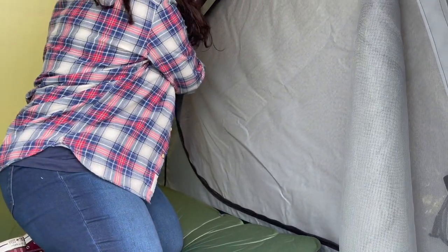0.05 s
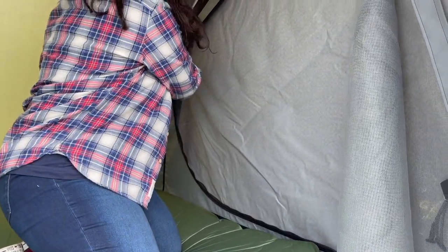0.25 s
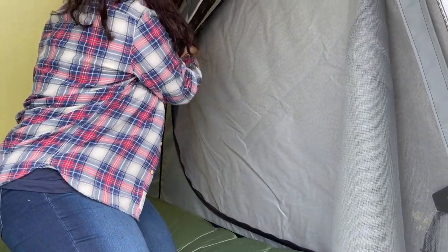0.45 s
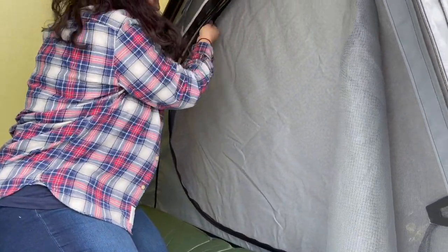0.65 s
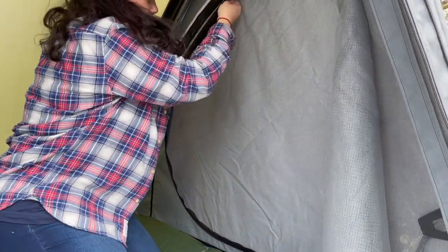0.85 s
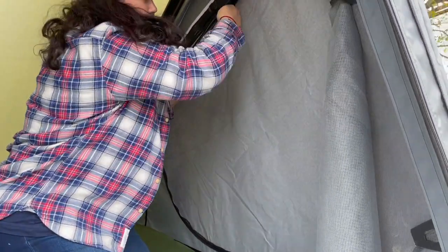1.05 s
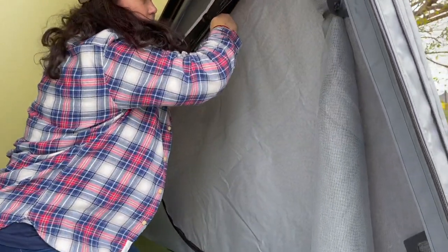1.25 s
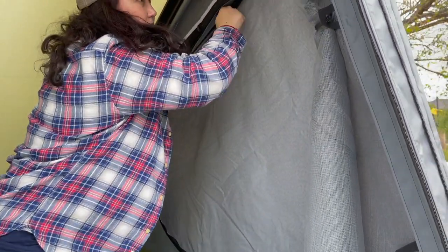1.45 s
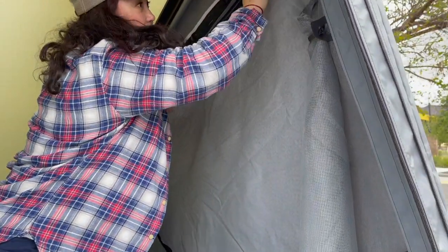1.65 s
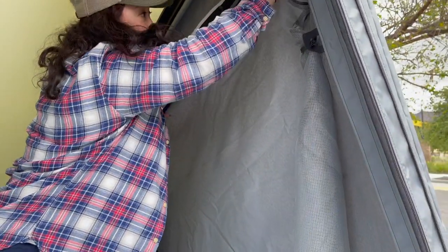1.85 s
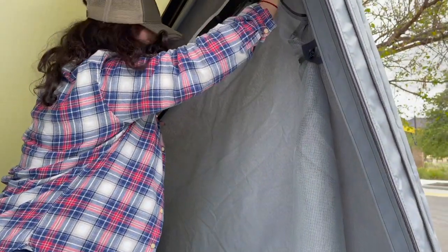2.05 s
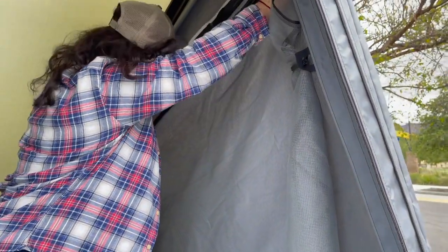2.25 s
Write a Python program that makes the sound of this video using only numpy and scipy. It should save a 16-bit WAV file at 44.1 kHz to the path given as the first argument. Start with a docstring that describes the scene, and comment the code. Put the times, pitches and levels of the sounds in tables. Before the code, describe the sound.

A zipper starts at about 0.2 seconds after a brief hiss, rasping and buzzing along a fabric wall, rising in pitch and stopping near 0.9. The metal tab clinks and cloth rustles. A second stroke runs from 1.4, slowing around 1.9 with dull fabric flaps and jingling, then gives a short last pull and clicks by 2.4. All is close and slightly left in a small, soft space.

```python
"""Zipping a camper wall

A long zipper is pulled along a fabric wall in two strokes, the second slowing round the top corner.
The slider ticks over the teeth: a bright rasp, and a buzz in the taut fabric whose pitch follows the
speed of the hand. The metal pull tab jingles, the wall flaps when tugged, cloth rustles, and a brief
hiss leads into the first stroke, all in a small, soft room and slightly to the left."""
import sys
import numpy as np
from scipy import signal
from scipy.fft import rfft, irfft, next_fast_len
from scipy.io import wavfile
from scipy.ndimage import map_coordinates

SR = 44100
rng = np.random.default_rng(int(sys.argv[2]) if len(sys.argv) > 2 else 0)


def unload_wav(signal):
    """Save mono or channel-first audio to the path in sys.argv[1] as 16-bit WAV at rate SR, clipped to [-1, 1]."""
    wavfile.write(
        sys.argv[1],
        SR,
        np.round(np.clip(np.atleast_2d(signal).T, -1, 1) * 32767).astype(np.int16),
    )


N = 105840

# Colour of the room tone (frequency [Hz], gain [dB])
ROOM_TONE_EQ = [(25, -31), (60, -7), (110, -3.5), (200, -4), (300, -1.5), (450, -11), (750, -28),
                (1200, -20), (1900, -16.5), (3000, -22.5), (9000, -25), (14000, -44)]
# Cloth rustles, and a brief hiss into the first stroke (centre time [s], length [s], level [dB])
NOISE_SWELLS = [(.0, 0.04, -54.5), (0.204, 0.034, -40), (0.986, 0.13, -54.5), (1.063, 0.07, -60),
                (1.136, 0.17, -57.5), (1.257, .1, -40.5), (1.298, 0.044, -42), (1.329, .08, -50.5),
                (2.33, 0.15, -51.5), (2.39, 0.098, -42.5)]
# Colour of those swells (frequency [Hz], gain [dB])
SWELL_EQ = [(80, -10.5), (200, 0.5), (450, 2), (1100, 2.5), (1900, -5), (2550, 2), (3300, -10.5),
            (6000, -17.5), (12000, -12.5), (14000, -37)]
# The wall flaps under a tug (time [s], relative level [dB], pitch [Hz])
FLAPS = [(.24, -35, 180), (0.646, -33, 157), (.675, -18, 230), (.688, -19.5, 166), (1.039, -38.5, 170),
         (1.668, -18, 134), (1.675, -24, 232), (1.73, -17, 181), (1.755, -17.5, 346), (1.781, -18.5, 175),
         (1.803, -16.5, 135.2), (1.82, -24, 130), (1.843, -21.5, 237), (1.862, -16, 110),
         (1.875, -22, 135.9), (1.945, -29, 125), (1.981, -23.5, 149.6), (1.995, -20, 102),
         (2.029, -28.5, 130.5), (2.098, -32.5, 90.1), (2.271, -30, 170), (2.293, -31.5, 200)]
# The fabric sings at taut spots (centre time [s], length [s], pitch [Hz], relative level [dB])
TAUT_SPOTS = [(0.288, 0.069, 1850, -25), (0.333, 0.094, 380, -28.5), (.43, 0.083, 852, -25.5),
              (0.46, 0.09, 2370, -25.5), (0.483, 0.036, 1280, -21.5), (.665, 0.19, 1707, -22),
              (0.673, 0.085, 1930, -24), (.68, 0.11, 1415, -25), (0.764, 0.13, 1210, -28.5),
              (1.45, .04, 425, -28), (1.485, 0.053, 515, -23), (1.617, 0.078, 430, -25.5),
              (1.69, 0.068, 475, -31.5), (2.187, 0.17, 1970, -37)]
# Ringing modes of slider and tab (frequency [Hz], level [dB], free t60 [s])
METAL_MODES = [(5505, 0, .06), (7310, -14, .03), (8490, -4, .09), (8545, -1, .1), (12630, -6, .07),
               (12720, -10, .05)]
# The tab strikes the slider, or the slider snaps into motion (time [s], ring level [dB], lowest mode trim [dB],
# top modes trim [dB], crack level [dB], damping [x free decay rate])
CLINKS = [(0.199, -40, 4, -6, -25.5, 2), (.305, -35, 15, 14, -36, 0.57), (.815, -31, 15, 0, -36, 0.73),
          (.915, -36.5, 12.5, 7, -50, 1.03), (.983, -19, -12.5, -18, -48, 3.5),
          (.997, -33.5, -14, -18, -45, 0.97), (1.279, -36.5, -24, -22, -55, 1.1),
          (1.366, -50, -3, -6, -30.5, 2.24), (1.397, -31, -14, -10, -52, 0.92), (1.78, -32, 10, 8, -40, 1),
          (1.885, -29.5, 1, 7, -42, 0.52), (1.902, -28, 3, -3, -42, 0.76), (1.925, -32, -5, -10, -45, 0.75),
          (1.944, -37, -16, -12, -45, 0.58), (1.962, -33.5, -12, -1, -40, 0.91),
          (2.0025, -38, -17, -12, -41, 0.88), (2.017, -36, -5, 14, -25, 0.63),
          (2.202, -37, -11, 17.5, -28, 1), (2.221, -27.5, -19, 8, -21, 1.1), (2.368, -44, -10, -6, -36, 1),
          (2.384, -32.5, -28, -3, -29.5, 1.1)]
# Speed of the slider (time [s], rate [teeth/s])
SLIDER_SPEED = [(.195, 70.6), (.225, 140), (.26, 225), (.31, 408), (.35, 424), (.41, 448), (.46, 555),
                (.52, 496), (.6, 597), (.665, 820), (.72, 610), (.78, 440), (.85, 470), (.89, 343),
                (.93, 90), (1.36, 88), (1.41, 300), (1.45, 425), (1.5, 544), (1.52, 723), (1.58, 560),
                (1.65, 490), (1.71, 478), (1.76, 360), (1.83, 270), (1.9, 140), (1.96, 70), (2.04, 91.6),
                (2.1, 100), (2.15, 233), (2.22, 244), (2.28, 80)]
# Fader moves of the first stroke (time [s], relative rasp level [dB], relative buzz level [dB])
FIRST_STROKE = [(0.2, -40, -37), (0.214, -26, -32), (0.302, -25.5, -25), (0.338, -26.5, -28),
                (0.496, -23, -26), (0.526, -26, -25.5), (0.668, -18.5, -21), (0.78, -24, -24.5),
                (0.82, -23.5, -24), (0.884, -25, -28.5), (0.91, -35.5, -41), (0.92, -42.5, -51),
                (0.96, -56, -67)]
# Fader moves of the second stroke (time [s], relative rasp level [dB], relative buzz level [dB])
SECOND_STROKE = [(1.34, -64.5, -58), (1.396, -29.5, -31.5), (1.43, -26.5, -33), (1.476, -23.5, -23.5),
                 (1.562, -23, -27), (1.606, -25.5, -22), (1.692, -28.5, -31), (1.782, -24.5, -27),
                 (1.864, -31.5, -33.5), (1.906, -39.5, -34.5), (1.954, -50, -43.5), (2.03, -43.5, -42.5),
                 (2.044, -39, -38), (2.136, -32.5, -29.5), (2.178, -34.5, -38.5), (2.22, -33.5, -33),
                 (2.306, -54, -59), (2.32, -58, -68)]
# Bright rasp of the teeth (frequency [Hz], gain [dB])
RASP_EQ = [(900, -49.5), (1700, -7.5), (2500, -3.5), (3600, -4.5), (4700, -2), (5500, -0.5), (6200, -4),
           (7300, -2.5), (7800, -3), (8600, -1.5), (9600, 3), (11100, 3), (12100, -11.5), (12700, -1),
           (14000, -28.5)]
# Fabric buzz when the slider runs fast (frequency [Hz], gain [dB])
FAST_BUZZ_EQ = [(150, -31.5), (300, -9), (480, -3), (800, 0), (1000, -1.5), (1250, 0.5), (1480, -2),
                (1750, 2), (2100, -5), (2450, -4.5), (3100, -13.5), (4500, -22), (9000, -57)]
# Fabric buzz when the slider crawls (frequency [Hz], gain [dB])
SLOW_BUZZ_EQ = [(150, -26.5), (300, -4.5), (550, 1.5), (750, 3), (1000, -12.5), (1400, -5), (1700, 1),
                (2000, 3), (2450, -1), (2800, 1.5), (3300, -36.5), (4500, -24), (9000, -48)]
# Harmonics of the ragged tooth hum (frequency [x tooth rate], level [dB])
HUM_HARMONICS = [(1, 2), (2, -3), (3, -5), (4, 1)]
# Low rub of the dragged wall (frequency [Hz], gain [dB])
DRAG_EQ = [(40, -18), (90, -7), (150, 0.5), (280, -6), (500, -5), (1500, -56)]
# How alike left and right are (frequency [Hz], likeness [0 to 1])
STEREO_LIKENESS = [(60, .75), (300, 0.79), (1200, 0.75), (3000, 1), (6000, 1), (9000, 0.79)]
# Level tilt between the microphone ports (frequency [Hz], left minus right [dB])
LEFT_BIAS = [(100, 0), (600, 2.5), (1200, 2.2), (2500, 2.5), (5500, 4), (7200, 2.5), (8200, 0.5),
             (13000, 0)]
# Phase between the microphone ports (frequency [Hz], left lead [rad])
LEFT_LEAD = [(100, 0), (1720, 0.28), (2930, 1.25), (5080, 1.15), (6720, 0.92), (7600, 1.12), (8870, -2.36),
             (9820, -2.5), (11800, -5.5), (12300, -5), (13200, -9.5)]


def amp(db):
    """Decibels to gain."""
    return 10 ** (np.asarray(db) / 20)


def unit(x):
    """Scale to rms 1."""
    return x / np.sqrt(np.mean(x ** 2) + 1e-20)


def along(points, hz):
    """Read a (frequency [Hz], value) curve on a log axis."""
    knots_hz, values = np.transpose(points)
    return np.interp(np.log(hz + 1), np.log(knots_hz + 1), values)


def clock():
    """Seconds at each sample."""
    return np.arange(N) / SR


def wobble(rate):
    """A smooth random curve with `rate` knots a second."""
    return map_coordinates(rng.standard_normal(int(N * rate / SR) + 4), [clock() * rate])


def filtered(x, response):
    """Apply a complex frequency response."""
    size = next_fast_len(N + SR // 2)
    return irfft(rfft(x, size) * response(np.fft.rfftfreq(size, 1 / SR)), size)[..., :N]


def coloured(x, eq, size=4096):
    """Minimum-phase EQ, built by folding the cepstrum."""
    cepstrum = irfft(np.log(amp(along(eq, np.fft.rfftfreq(size, 1 / SR)))))
    cepstrum[1:size // 2] *= 2
    cepstrum[size // 2 + 1:] = 0
    return signal.fftconvolve(x, irfft(np.exp(rfft(cepstrum))))[:N]


def noise(eq):
    """Coloured noise of rms 1."""
    return unit(coloured(rng.standard_normal(N), eq))


def swell(centre_s, length_s):
    """A smooth fade up and down."""
    return np.cos(np.pi * np.clip((clock() - centre_s) / length_s, -.5, .5))


def add(track, start_s, sound):
    """Drop a sound onto a track."""
    part = track[max(round(start_s * SR), 0):][:len(sound)]
    part += sound[:len(part)]


def stroke_levels():
    """Rasp and buzz faders in dB, closed outside the two strokes."""
    t, closed_db = clock(), -200
    strokes = np.array(FIRST_STROKE), np.array(SECOND_STROKE)
    return [np.maximum(*(np.interp(t, p[:, 0], p[:, column], closed_db, closed_db) for p in strokes))
            for column in (1, 2)]


def room_tone(level_db=-54.5):
    """A faint, dark, steady bed of noise."""
    return amp(level_db) * noise(ROOM_TONE_EQ)


def rustles_and_hiss():
    """Soft swells of grainy noise: cloth rustles, and a brief hiss leading into the first stroke."""
    grainy = unit(noise(SWELL_EQ) * amp(3.4 * wobble(220)))
    return grainy * sum(amp(db) * swell(s, length) for s, length, db in NOISE_SWELLS)


def wall_flaps(rise_s=.0042, decay_s=.01, puff_gain=.56, trim_db=-3.5):
    """The slack wall snaps tight: a dull thud of a few cycles with a puff of noise."""
    out, t = np.zeros(N), np.arange(SR // 8) / SR
    envelope = (1 - np.exp(-t / rise_s)) * np.exp(-t / decay_s)
    envelope /= envelope.max()
    puff = noise([(25, 18), (60, -26.5), (110, 1.5), (300, 1), (600, -11.5), (1500, -46.5), (5000, -74)])
    for s, db, hz in FLAPS:
        thud = np.sin(2 * np.pi * hz * t) + puff_gain * np.roll(puff, -round(s * SR))[:len(t)]
        add(out, s, amp(db + trim_db) * envelope * thud)
    return out


def wall_drag(buzz_db):
    """The dragged wall gives a low rub that gently follows the buzz fader."""
    return amp(-48.5 + .2 * (buzz_db + 30)) * noise(DRAG_EQ)


def fabric_song(q=16.6, trim_db=-1.5):
    """Narrow resonances of the wall swell and fade as the slider passes taut spots."""
    out = np.zeros(N)
    for s, length, hz, db in TAUT_SPOTS:
        band = filtered(rng.standard_normal(N), lambda f: 1 / (1 + (2 * q * (f - hz) / hz) ** 2))
        out += amp(db + trim_db) * swell(s, length) * unit(band)
    return out


def metal_ring(damping, lowest_db=0, top_db=0):
    """One hit on slider and tab: decaying modes, balanced a little differently each time."""
    t = np.arange(SR // 6) / SR
    ring = np.zeros(len(t))
    for trim_db, (hz, db, t60) in zip([lowest_db, 0, 0, 0, top_db, top_db], METAL_MODES):
        envelope = amp(db + trim_db + rng.normal(0, .94) - 60 * damping * t / t60)
        ring += envelope * np.sin(2 * np.pi * (hz * t + rng.random()))
    return ring


def metal_clinks(crack_s=.0031):
    """Jerked or let go, the tab strikes the slider, and the slider snaps as it jerks into motion: a sharp crack
    and a ring."""
    out, t = np.zeros(N), np.arange(SR // 6) / SR
    for s, db, lowest_db, top_db, crack_db, damping in CLINKS:
        crack = np.diff(rng.standard_normal(len(t) + 1)) * np.exp(-t / crack_s)
        add(out, s, amp(db) * metal_ring(damping, lowest_db, top_db) + amp(crack_db) * crack)
    return out


def tab_jingle(rasp_db, hits_per_s=170, flicker_db=3.5):
    """The held tab chatters in quickly damped rings, riding under the rasp while the slider runs."""
    jingle = np.zeros(N)
    for when, size in rng.random((int(hits_per_s * N / SR), 2)):
        add(jingle, when * N / SR, amp(2.7 * size) * metal_ring(damping=3.3))
    level_db = np.minimum(-38 + .45 * (rasp_db + 30), rasp_db)
    return amp(level_db) * unit(jingle * amp(flicker_db * wobble(24.63)))


def tooth_ticks(rate, teeth_passed, jitter_teeth=.1, scatter_db=1.6, tick_s=.0026, slide_share=.55):
    """One uneven pulse per tooth, and the envelope of their ticks over steady sliding."""
    teeth = np.arange(1, int(teeth_passed[-1]))
    offset, size = rng.standard_normal((len(teeth), 2)).T
    hits = np.interp(teeth + jitter_teeth * offset, teeth_passed, np.arange(N)).astype(int)
    pulses = np.bincount(hits, amp(scatter_db * size) / np.sqrt(rate[hits]), N)
    energy = signal.lfilter([1], [1, -np.exp(-2 / (tick_s * SR))], pulses ** 2)
    return pulses, np.sqrt(np.abs(energy / energy.mean() + slide_share))


def tooth_hum(rate, teeth_passed, onset_hz=334):
    """A ragged tone at the tooth rate; it fades out when the teeth come slowly."""
    tone = sum(np.cos(2 * np.pi * k * teeth_passed + .29 * wobble(150)) * amp(db + 3 * wobble(50.15))
               for k, db in HUM_HARMONICS)
    return unit(tone) / (1 + (onset_hz / rate) ** 8)


def fabric_buzz(rate, pulses, tick_envelope, crawl_hz=306, roughness=.7):
    """Teeth pluck the taut fabric: a pitched buzz at speed, crossfading to a scrape at a crawl."""
    grit = unit(tick_envelope * rng.standard_normal(N))
    plucks = unit(pulses - pulses.mean()) + roughness * grit
    fast = unit(coloured(plucks, FAST_BUZZ_EQ))
    slow = unit(coloured(tick_envelope * rng.standard_normal(N), SLOW_BUZZ_EQ))
    slow_share = 1 / (1 + (rate / crawl_hz) ** 5)
    return np.sqrt(1 - slow_share) * fast + np.sqrt(slow_share) * slow


def zipper(rasp_db, buzz_db):
    """Every tooth gives a scratchy tick and plucks the fabric, at a rate set by the hand."""
    rate = np.interp(clock(), *np.transpose(SLIDER_SPEED)) * np.exp(.04 * wobble(90))
    teeth_passed = np.cumsum(rate) / SR
    pulses, tick_envelope = tooth_ticks(rate, teeth_passed)
    rasp = unit(coloured(tick_envelope * rng.standard_normal(N), RASP_EQ))
    buzz = fabric_buzz(rate, pulses, tick_envelope)
    hum = tooth_hum(rate, teeth_passed)
    return amp(rasp_db + 1.5) * rasp + amp(buzz_db - 1.5) * buzz + amp(buzz_db - 11) * hum


def camper_room(x, t60_s=.066, echo_db=-6, change_s=.08):
    """A small, soft room whose reflections shift as slider and arm move; diffuse sound adds width."""
    t = np.arange(SR // 8) / SR
    wet = np.zeros((2, N))
    hop = int(change_s * SR)
    fade = np.sqrt(signal.get_window("hann", 2 * hop))
    padded = np.pad(x, (hop, 2 * hop))
    for start in range(0, N + hop, hop):
        grain = padded[start:start + 2 * hop] * fade
        tails = rng.standard_normal((2, len(t))) * amp(-60 * t / t60_s) * (t > .001)
        for track, tail in zip(wet, tails):
            reflections = signal.fftconvolve(grain, tail / np.linalg.norm(tail))
            add(track, (start - hop) / SR, reflections[max(hop - start, 0):])
    echo, diffuse = wet
    mid = (x + amp(echo_db) * echo) / np.hypot(1, amp(echo_db))
    alike = lambda hz: np.clip(along(STEREO_LIKENESS, hz), 0, .999)
    side = filtered(diffuse, lambda hz: np.sqrt((1 - alike(hz)) / (1 + alike(hz))))
    return np.array([mid + side, mid - side])


def scene():
    """All layers play in the room, slightly left of the two microphone ports."""
    rasp_db, buzz_db = stroke_levels()
    backing = rustles_and_hiss() + wall_flaps() + wall_drag(buzz_db) + fabric_song()
    tab = metal_clinks() + tab_jingle(rasp_db)
    stereo = camper_room(room_tone() + backing + tab + zipper(rasp_db, buzz_db))
    split = np.array([[.5], [-.5]])
    pan = lambda hz: amp(split * along(LEFT_BIAS, hz)) * np.exp(1j * split * along(LEFT_LEAD, hz))
    return filtered(stereo, pan)


def record(dry):
    """The microphone thins the bass, has a notch in the treble and falls away steeply above it."""
    bass_hz, notch_hz, half_width_hz, rolloff_hz, top_hz = 53, 10220, 320, 13000, 15600
    low_cut = lambda hz: (1j * hz / (bass_hz + 1j * hz)) ** 3
    notch = lambda hz: (hz - notch_hz) ** 2 / ((hz - notch_hz) ** 2 + half_width_hz ** 2)
    high_cut = lambda hz: (hz < top_hz) / (1 + (hz / rolloff_hz) ** 60)
    return filtered(dry, lambda hz: low_cut(hz) * notch(hz) * high_cut(hz))


dry = scene()
out = record(dry)
unload_wav(out)
```